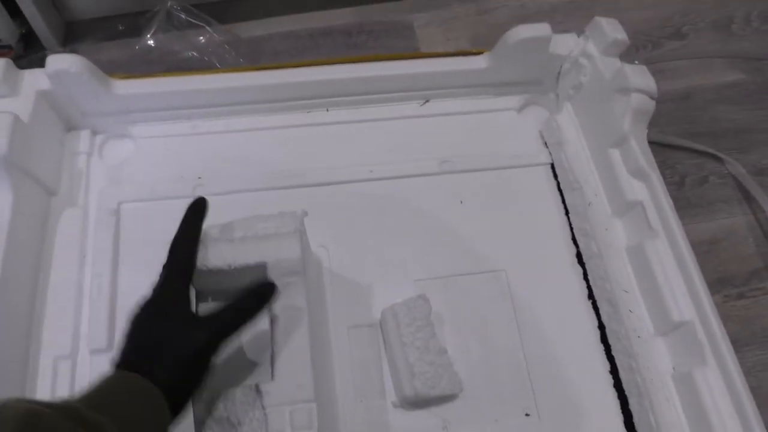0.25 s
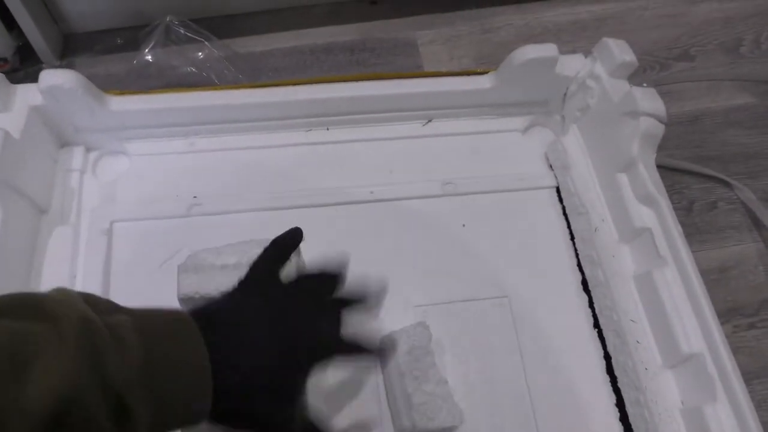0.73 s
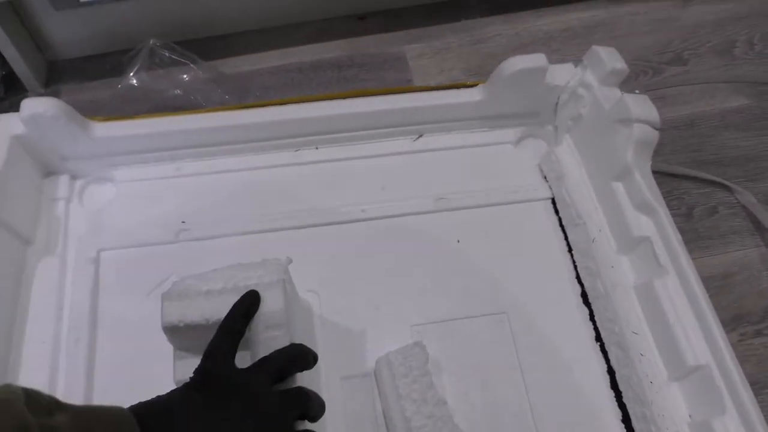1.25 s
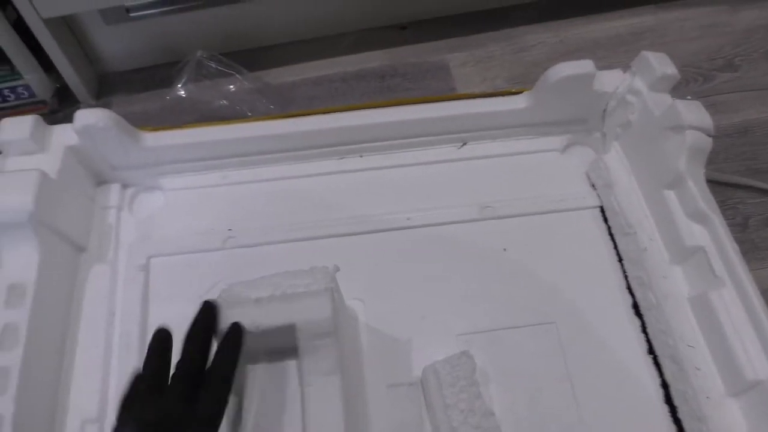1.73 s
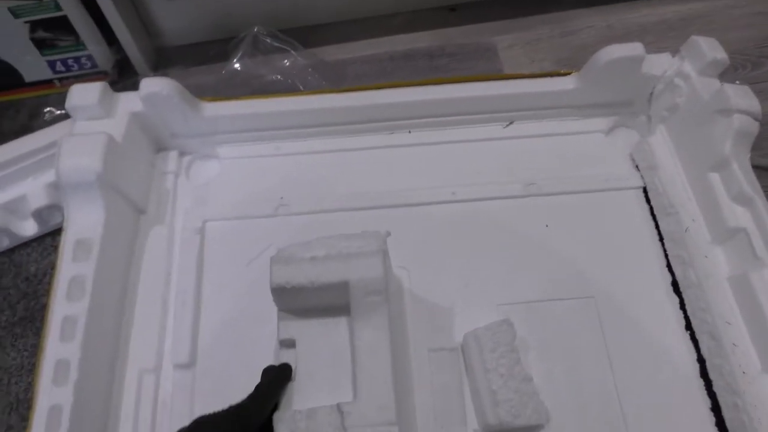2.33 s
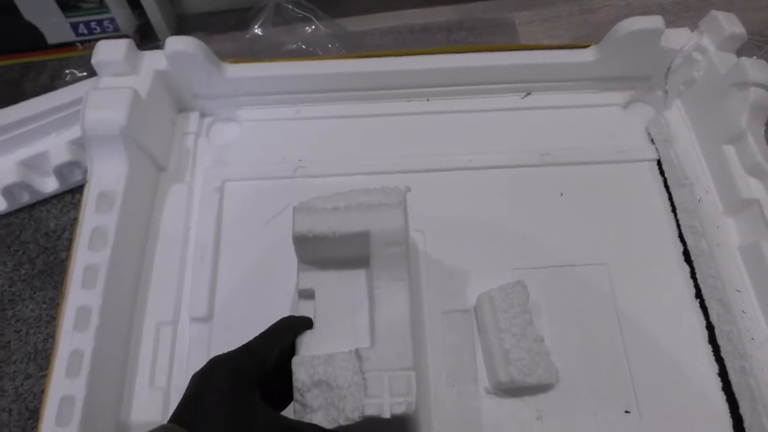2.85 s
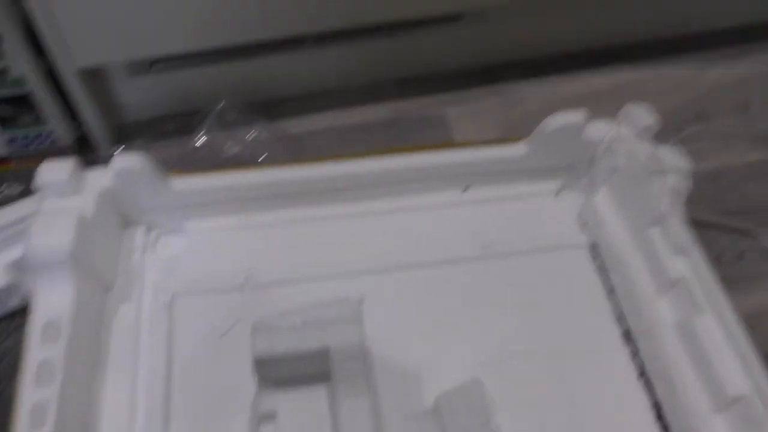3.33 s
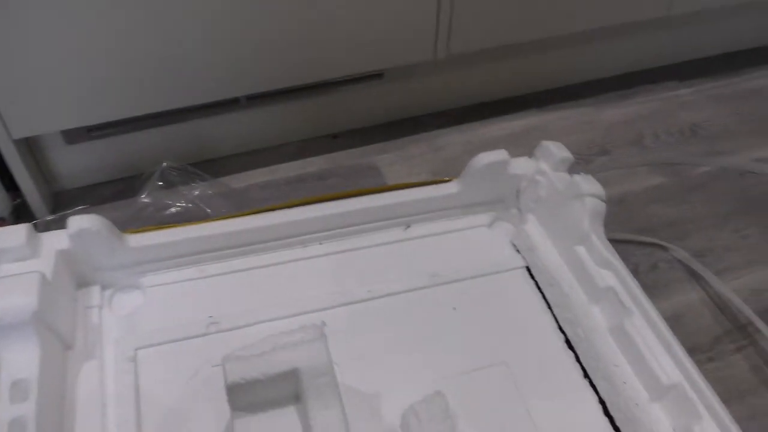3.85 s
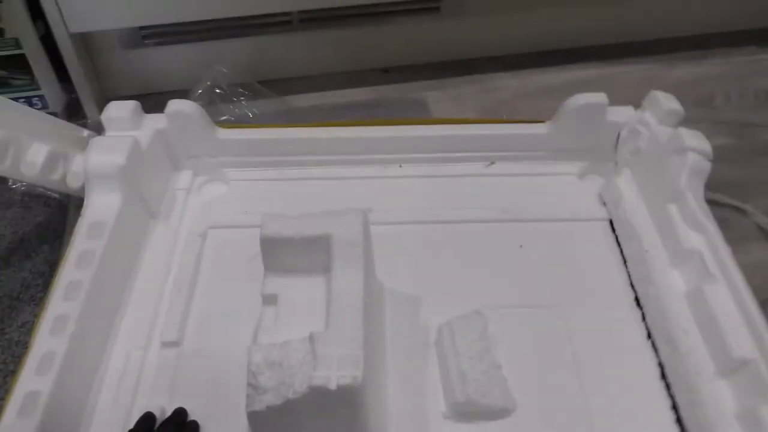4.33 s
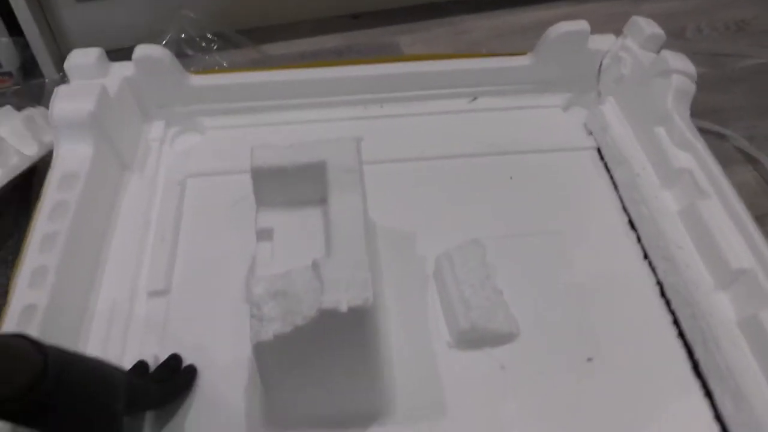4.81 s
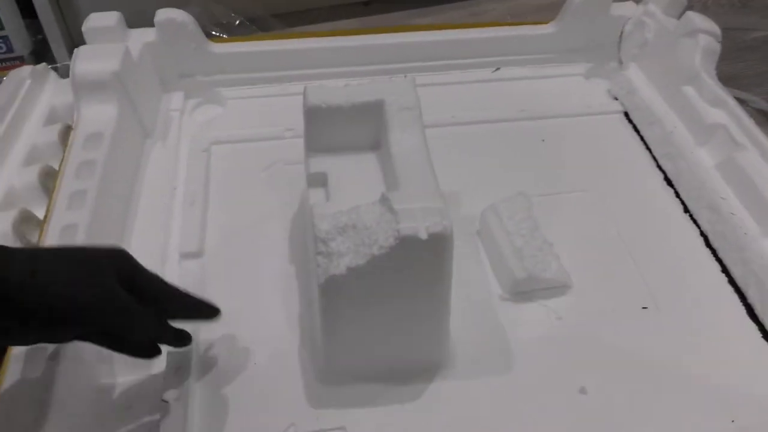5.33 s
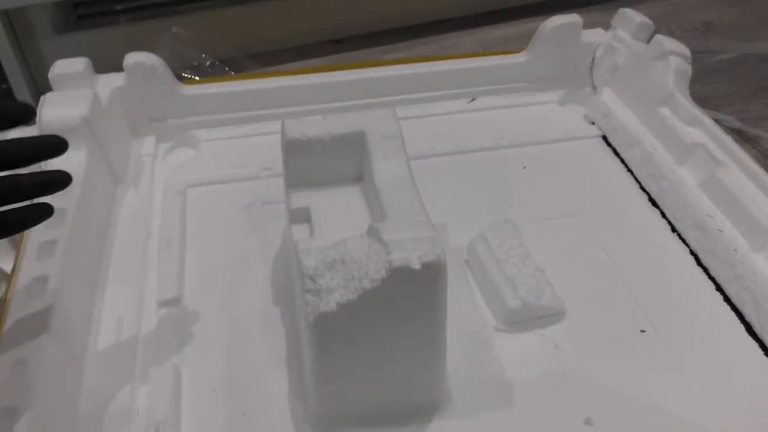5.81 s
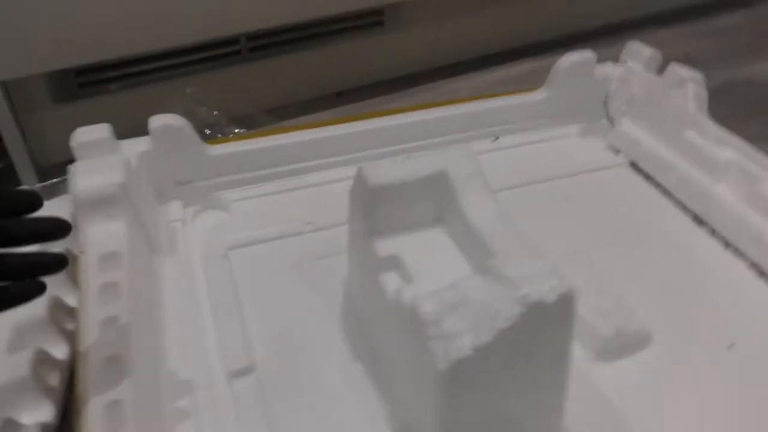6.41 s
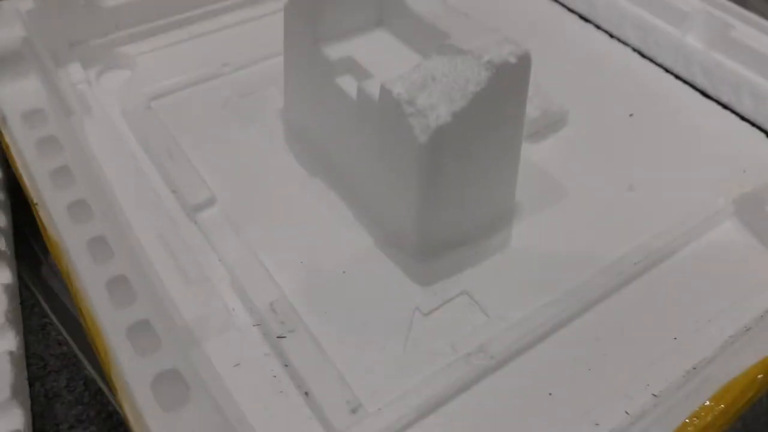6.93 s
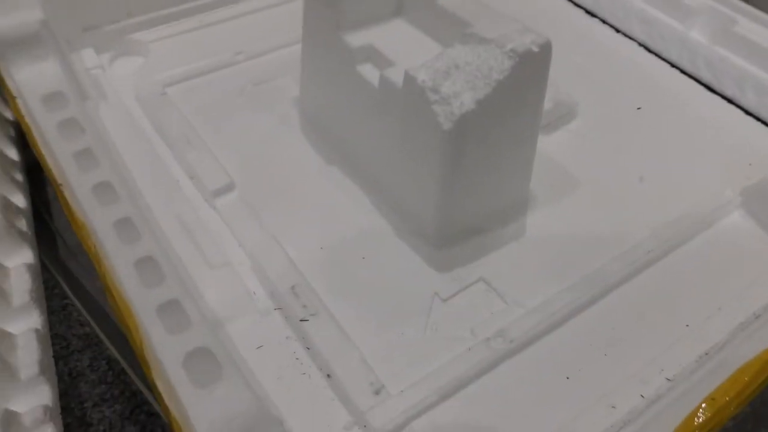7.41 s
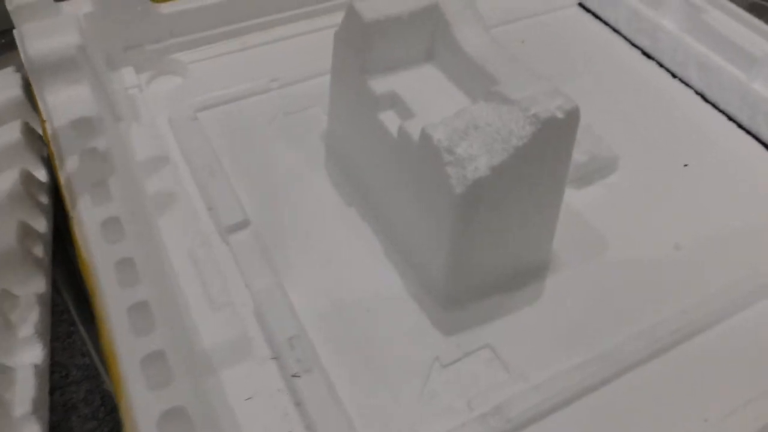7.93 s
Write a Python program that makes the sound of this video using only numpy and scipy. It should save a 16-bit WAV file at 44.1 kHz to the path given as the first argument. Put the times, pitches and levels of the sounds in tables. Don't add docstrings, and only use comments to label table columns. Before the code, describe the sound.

Close foam packing squeaks, scrapes and snaps under a glove, knocking boomily on its tray, then settles into sparse faint ticks and quiet room hum.

```python
import sys
import numpy as np
from scipy import signal
from scipy.fft import rfft, irfft, next_fast_len
from scipy.io import wavfile
from scipy.ndimage import uniform_filter1d

SR = 44100
rng = np.random.default_rng(int(sys.argv[2]) if len(sys.argv) > 2 else 0)


def wav_record(signal):
    frames = np.transpose(np.atleast_2d(signal))
    bounded = np.clip(frames, -1, 1)
    quanta = np.round(bounded * 32767).astype(np.int16)
    wavfile.write(sys.argv[1], SR, quanta)


def field_ratio(decibels):
    return 10 ** (np.asarray(decibels, dtype=float) / 20)


N = 359856

# pitch_hz, level_db_per_hz
AIR = [(18, -60), (30, -23), (81, 1.5), (180, -12), (287, -5), (560, -24.5), (1190, -25), (2750, -52)]
# pitch_hz, width_hz, level_db
HUM = [(82.7, 3.9, -56.5), (125.6, 11.3, -59)]
# pitch_hz, likeness_0_to_1
LIKENESS = [(60, 0.93), (150, 0.84), (330, 0.98), (700, 0.82), (1500, 0.71), (4000, 0.68), (8000, 1),
            (14000, 0.51)]
# time_s, left_minus_right_db
AIM = [(0, 0), (1.4, 0.2), (3.2, -0.5), (5.2, 1), (7.2, 0.5)]

# middle_s, scrape_db, slope_db_per_s, brightness_db, weight_on_tray_db
DRAGS = [(.1, -53, 34, -8.5, -6), (.915, -40, 302, 15, -2.5), (.98, -45.5, 114, 6, -6),
         (1.56, -39, 92, -8, -4), (1.693, -29.5, 205, -13, -5.5), (1.84, -46, 78, -24, 11.5),
         (2.14, -36.5, 61.5, 5, -3.5), (2.9, -61, 23, -2, 11), (3.35, -61.5, 15, -47, -2),
         (3.536, -37, 398, 1.5, 4), (3.566, -35.5, 505, 4.5, -3), (3.9, -50, 70, 3, -27),
         (4.27, -38.5, 43, 1, -1), (4.35, -33.5, 56, 6, -5), (4.44, -41.5, 60, -5, 6),
         (4.56, -32, 32, -0.5, -5), (4.703, -24, 239, -1, -6.5), (4.78, -36, 72, -0.5, -0.5),
         (5.1, -42.5, 6, -4, -1), (5.43, -38.5, 105, 8, 2.5), (5.475, -40.5, 152, 9, -3),
         (5.67, -56, 156, -2, -6), (5.75, -34, 67, -2, -6), (6.099, -49, 43, -4, 1.5),
         (6.86, -47, 13, -4, -3), (7.45, -51.5, 24, -25, -0.5)]
# start_s, scrape_db, hold_s, brightness_db
GRABS = [(0.409, -37, 0.014, -2), (0.542, -41, 0.023, -3), (0.748, -41.5, 0.029, -7),
         (1.045, -41.5, 0.0085, -3), (1.188, -43, 0.021, -1.5), (1.261, -43.5, 0.14, -6),
         (1.38, -45.5, 0.018, 18), (1.731, -39, 0.022, 0), (1.93, -32, 0.11, 0), (2.192, -46, 0.095, 10.5),
         (2.581, -55, 0, 5), (2.666, -52.5, 0, 3), (2.785, -36.5, 0.0069, -3.5), (3.136, -40, 0.0042, -3.5),
         (3.7, -54, 0.01, 1.5), (3.512, -43.5, 0.064, 9.5), (3.749, -44.5, 0, 7), (3.872, -60, 0.089, 19),
         (4.113, -43.5, 0.014, 15), (4.166, -35.5, 0.087, -3), (5.373, -36.5, 0, -11),
         (5.574, -38.5, 0.05, -15), (6.428, -51, 0.073, -10), (6.64, -53, 0.077, -11),
         (6.82, -44.5, 0.0076, -7), (7.285, -59.5, 0.097, 6), (8.115, -53, .05, -2.5)]
RESTING_DB = -74, -84, -79
# pitch_hz, level_db_per_hz
BOOM = [(59, -29), (100, -13.5), (210, -8.5), (306, 2), (360, -1.5), (605, -14), (850, -18), (1100, -61)]
# pitch_hz, level_db_per_hz
SCRAPE = [(470, -6), (800, -11.5), (1040, 8.5), (2230, 5.5), (2620, 3), (3580, -1.5), (4200, -7.5),
          (5460, -14.5)]
# pitch_hz, level_db_per_hz
HISS = [(2470, -16.5), (4200, -3), (7150, -4.5), (8790, -3.5), (12200, -6), (15100, -12), (16000, -13)]
# pitch_hz, width_hz, level_db
CELLS = [(930, 13, -13), (1032, 50, 0), (1450, 31, -10), (2105, 32, -7), (2330, 38, -3.5), (2730, 35, -1),
         (3203, 99, -4), (3530, 43, 2), (3830, 96, -1.5), (4830, 27, -0.5), (6630, 100, 1),
         (7180, 28, -9.5), (7440, 33, -7), (10300, 95, -5)]

# time_s, level_db
SQUEAKS = [
    [(.84, -47), (.865, -34), (.882, -39.5), (.897, -25), (.91, -32.5), (.93, -61)],
    [(.885, -63), (.9, -34.5), (.92, -30), (.93, -40), (1.0, -46.5), (1.07, -58)],
    [(1.368, -50), (1.38, -36.5), (1.407, -19), (1.429, -27), (1.436, -37), (1.47, -35), (1.5, -33.5),
     (1.56, -35.5), (1.64, -49.5)],
    [(1.92, -39), (1.945, -31.5), (1.975, -27.5), (2.0, -34), (2.05, -28), (2.1, -52)],
    [(2.222, -38), (2.232, -21.5), (2.238, -25.5), (2.246, -30), (2.27, -38)],
    [(2.262, -46), (2.28, -27), (2.295, -36), (2.307, -27), (2.316, -29.5), (2.4, -41), (2.57, -69)],
    [(2.72, -35), (2.742, -30), (2.75, -22.5), (2.756, -33), (2.765, -30), (2.785, -25.5), (2.82, -29),
     (2.84, -46)],
    [(3.722, -37.5), (3.76, -33), (3.8, -52)],
    [(.08, -63), (.2, -52), (.3, -75)],
    [(1.568, -50), (1.578, -31.5), (1.6, -33), (1.615, -33.5), (1.65, -45)],
    [(1.465, -43), (1.478, -28), (1.485, -25), (1.497, -34), (1.51, -52)],
    [(2.06, -53), (2.12, -45), (2.2, -35), (2.23, -39)],
    [(1.385, -45), (1.405, -25), (1.415, -29), (1.425, -50)],
    [(3.5, -57), (3.53, -34.5), (3.555, -27), (3.58, -36), (3.62, -52)],
    [(1.255, -57), (1.275, -40), (1.295, -36.5), (1.315, -57)],
    [(2.27, -45), (2.279, -26), (2.29, -45)],
]
# pitch_hz, width_hz, level_db
SKIN = [
    [(1250, 420, -3.5), (1830, 1700, -3), (2600, 130, -2.5)],
    [(2340, 170, -2), (4000, 400, 0.5), (5170, 330, -4), (6100, 360, -2.5), (6700, 530, 0.5),
     (7500, 2500, -1)],
    [(2380, 640, -11), (2680, 180, -3), (3260, 220, -8.5), (4810, 150, -7), (5390, 120, -14),
     (5830, 120, -15), (7040, 150, -12.5), (9310, 270, -13), (9900, 4500, -6), (4000, 2200, -6.5)],
    [(2090, 190, -14), (2290, 330, -11), (2100, 870, -1), (3570, 190, -13), (4790, 110, -12),
     (5570, 150, -14), (6600, 260, -12), (8100, 250, -24), (10500, 830, -6)],
    [(2500, 240, -5.5), (7400, 180, -0.5), (6300, 470, -14), (10900, 820, -11), (14100, 1900, -7)],
    [(7930, 330, -6.5), (8400, 200, -13), (9200, 250, -11), (8150, 5700, -2), (10500, 340, -6),
     (11500, 500, -17), (13600, 1200, -11), (2290, 470, -15)],
    [(352, 73, -4)],
    [(426, 280, -1.5), (1070, 62, -2.5), (1480, 58, -7.5), (2220, 660, -8.5)],
    [(5000, 21000, 0.5)],
    [(345, 95, -4), (269, 130, -9)],
    [(3180, 170, -3.5), (2510, 310, -3), (5000, 250, -10), (9700, 2200, -3)],
    [(4770, 260, -2), (1520, 370, -4), (3440, 520, -3), (5400, 300, -6)],
    [(2200, 200, -0.5), (5810, 150, -9)],
    [(11500, 4500, 0), (4200, 1200, -6.5)],
    [(2200, 1700, -0.5)],
    [(10500, 500, 2), (11800, 500, -5)],
]
CLIMBS = [0.1, 0.25, 0.14, 0.0406, 0.019, 0.12, 0.096, 0.029, -0.011, 0.072, -0.15, -0.0091, .15, .01, .01,
          .08]

# start_s, peak_db, pitch_hz
KNOCKS = [(0.412, -25.5, 318), (0.548, -30.5, 303), (.77, -19, 220), (1.191, -28.5, 320), (1.688, -19, 363),
          (1.797, -23, 396), (3.137, -22.5, 320), (3.534, -27.5, 395), (3.726, -25.5, 269),
          (4.179, -14, 414), (4.75, -19, 320), (4.99, -26.5, 313), (5.043, -29, 320), (5.583, -10, 370),
          (5.594, -17, 350), (5.606, -21, 330)]
# start_s, peak_db, pitch_hz
BUMPS = [(1.048, -27.5, 328), (1.276, -9, 269), (1.305, -21, 258), (1.708, -20.5, 380), (2.579, -26.5, 380),
         (2.799, -20, 345), (3.951, -26.5, 345), (1.943, -13.5, 413), (2.644, -26, 350), (5.375, -9.5, 298),
         (5.378, -23.5, 125), (5.579, -26, 125), (5.572, -12.5, 252), (5.622, -19, 443),
         (5.744, -23.5, 183), (5.827, -23.5, 223), (6.336, -28.5, 280), (7.218, -27, 245),
         (7.458, -34.5, 268), (7.524, -32.5, 248), (7.594, -35, 267), (5.66, -21, 450), (4.217, -21, 290),
         (4.408, -21.5, 280), (4.437, -25, 310), (4.515, -24, 310), (4.565, -24, 330), (4.18, -16.5, 240)]
# pitch_hz, level_db, share_of_ring_time
TRAY = [(122, 3.5, 0.95), (211.5, -2, 0.93), (270, 1.5, 0.45), (340, 3, 0.31), (396, 2.5, 0.43),
        (469, -12, 0.99)]
# pitch_hz, level_db, share_of_ring_time
BLOCK = [(682, -3.5, 0.95), (950, 3.5, 0.53), (1085, 5.5, 0.47), (1260, -2, 0.66), (1470, -5, 0.38)]

# start_s, peak_db, pitch_hz
TAPS = [(0.412, -18, 1480), (0.551, -19.5, 2840), (0.743, -27, 2710), (0.77, -17.5, 1356),
        (0.846, -25, 1240), (1.054, -21, 1270), (1.197, -23, 1450), (1.262, -23, 2710), (1.374, -14, 2290),
        (1.741, -19, 1710), (1.925, -17, 1960), (2.571, -24.5, 1700), (2.645, -23.5, 1650),
        (2.7936, -19, 1340), (2.891, -29, 2730), (3.1419, -21, 1620), (3.7634, -21, 1400),
        (3.8827, -19, 11100), (5.378, -6.5, 1220), (5.5862, -11, 1050), (5.587, -21, 2500),
        (4.181, -21, 1010), (1.689, -25, 1090), (6.4417, -25.5, 1590), (7.332, -23.5, 1440)]
# start_s, peak_db, pitch_hz, brightness_db
SNAPS = [(2.227, -3.5, 7300, -26), (2.2445, -11.5, 11000, 2.5), (2.306, -13.5, 11000, -1),
         (3.8385, -22, 4070, -5.5), (3.955, -12.5, 2200, -18), (4.12, -14, 4270, -8.5),
         (4.714, -20, 2500, -1), (4.943, -18.5, 9100, -5), (4.9995, -14, 4650, -9), (5.09, -30, 5500, -8),
         (5.2165, -20.5, 3400, -7.5), (5.269, -21.5, 9800, -15), (5.316, -22.5, 1390, -35),
         (5.545, -29, 12000, -11), (5.629, -23.5, 3000, -0.5), (5.7037, -13.5, 1130, -6),
         (5.826, -24, 1870, -7), (0.757, -32, 6000, 0), (3.494, -46, 9500, -15), (3.624, -26.5, 9000, 0),
         (3.901, -27, 11000, -5), (3.913, -24.5, 10000, -5), (4.039, -29, 11500, -8),
         (4.052, -29, 10500, -8), (4.068, -25, 12500, -7), (5.986, -25.5, 9000, -0.5),
         (6.129, -20, 4000, -10), (6.387, -36, 11000, -20), (6.6441, -23.5, 2000, -8),
         (6.686, -31, 10000, -3), (7.773, -39, 9000, -3), (7.832, -39, 10000, -3), (2.951, -34, 8920, -2),
         (7.9132, -27.5, 3300, -6), (1.261, -19, 10200, -7), (5.1704, -27, 3500, -8),
         (5.2533, -21, 3100, -6.5), (8.134, -31.5, 8000, -6)]
# start_s, peak_db, pitch_hz
TICKS = [(1.707, -13, 1300), (4.1, -20.5, 2300), (4.0584, -11.5, 1710), (4.626, -12, 2400),
         (7.3, -29, 2500), (5.658, -6, 10000), (5.9929, -13.5, 1900), (6.108, -21.5, 2650),
         (6.128, -14, 10400), (6.2656, -22.5, 3040), (6.2913, -19.5, 1250), (4.107, -16, 3200),
         (7.653, -25, 1500), (7.7535, -26, 1220), (2.486, -30, 2000), (7.596, -32, 5800),
         (7.677, -36, 5000), (7.8037, -34, 5500), (7.528, -32, 1500), (8.3, -26, 1180), (7.3721, -31, 1450),
         (5.377, -11, 3300), (3.9555, -9, 11000), (5.5865, -11, 1000), (4.437, -17, 2400)]
# start_s, peak_db, pitch_hz
GRAINS = [(2.582, -31, 1070), (2.9504, -37.5, 1070), (3.037, -42, 1060), (3.0683, -40, 1060),
          (4.0264, -28, 1070), (4.2444, -17, 1040), (4.9664, -25, 1060), (5.171, -38, 1110),
          (6.2487, -34, 1200), (6.513, -32.5, 2400), (6.552, -36, 1680), (6.8244, -31, 1400),
          (6.9503, -30, 1900), (7.2744, -46, 1320), (7.296, -32, 2050), (7.423, -36.5, 1210),
          (7.5158, -36, 1210), (7.5965, -41, 1840), (7.6774, -45.5, 1070), (7.7228, -38, 1210),
          (7.8037, -38.5, 1890), (7.9504, -36, 1120), (8.0711, -44, 2130)]


def rms_one(x):
    return x / np.sqrt(np.mean(x ** 2) + 1e-20)


def in_time(rows):
    s, *columns = np.transpose(rows)
    return [np.interp(np.arange(N) / SR, s, column) for column in columns]


def at_hz(points, hz):
    point_hz, value = np.array(points).T
    return np.interp(np.log(hz), np.log(point_hz), value)


def drift(rate_hz):
    r = np.exp(-40 * np.pi * rate_hz / SR)
    noise = rng.standard_normal(N // 20 + 2002)
    slow = signal.lfilter([1], [1, -2 * r, r * r], noise)[2000:]
    return np.interp(np.arange(N) / 20, np.arange(len(slow)), rms_one(slow))


def resonate(x, hz, width_hz):
    r = np.exp(-np.pi * width_hz / SR)
    feed = (1 - r * r) / 2 * np.array([1, 0, -1])
    back = [1, -2 * r * np.cos(2 * np.pi * hz / SR), r * r]
    return signal.lfilter(feed, back, x)


def slips(per_s, spread_db, smooth):
    shape = (2, 2, N)
    trains, luck = np.zeros(shape), rng.random(shape)
    slip = luck < per_s / SR
    odds = luck[slip] * SR / per_s
    rarity = np.minimum(-np.log(np.abs(2 * odds - 1) + 1e-9), 5)
    trains[slip] = field_ratio(spread_db * rarity) * np.sign(odds - 0.5)
    bed = smooth * rng.standard_normal(shape) if smooth else 0
    return rms_one(trains) + bed


def coloured(drive, spectrum, patchy_db):
    together = 0.75 * drift(93.0) + 1.08 * drift(18.6)
    lowest, highest = spectrum[0][0], min(spectrum[-1][0], 17500) * 1.05
    edges = np.geomspace(lowest, highest, round(2.5 * np.log2(highest / lowest)) + 1)
    out = 0
    for k, (low, high) in enumerate(zip(edges, edges[1:])):
        band = signal.butter(2, [low, high], "band", fs=SR, output="sos")
        mid, side = signal.sosfilt(band, drive[k % 2])
        hz = np.sqrt(low * high)
        alike = np.clip(at_hz(LIKENESS, hz), 0, 0.995)
        flicker_db = patchy_db * (0.45 * together + drift(10.7))
        gain = field_ratio(at_hz(spectrum, hz) + flicker_db)
        out = out + gain * (np.sqrt(1 + alike) * mid + np.sqrt(1 - alike) * side * [[1], [-1]])
    return rms_one(out)


def background():
    hum = 0
    for hz, width_hz, db in HUM:
        tone = resonate(resonate(rng.standard_normal(N), hz, width_hz), hz, width_hz)
        hum = hum + field_ratio(db) * rms_one(tone)
    air = field_ratio(-51.5) * coloured(rng.standard_normal((2, 2, N)), AIR, patchy_db=-0.8)
    mic_hiss = field_ratio(-65) * rng.standard_normal((2, N))
    return air + hum + mic_hiss


def strokes():
    t = np.arange(0, N / SR + 1 / 500, 1 / 500)[:, None]
    rise_db_s, fall_db_s = 1800, 143
    s, grab_db, hold, grab_bright_db = np.transpose(GRABS)
    top = s + 0.0079
    after_hold = np.maximum(t - top - np.maximum(hold, 0), 0)
    grab_below = np.maximum(rise_db_s * (top - t), fall_db_s * after_hold)
    grab_weight_db = -7 - 1.1 * grab_bright_db
    middle, drag_db, slope, drag_bright_db, drag_weight_db = np.transpose(DRAGS)
    drag_below = slope * np.abs(t - middle)
    fade_speeds = (1, 1, 1.327)
    grab_tilts = (grab_weight_db, 0, grab_bright_db)
    drag_tilts = (drag_weight_db, 0, drag_bright_db)
    levels = []
    for rest_db, fades, grab_tilt_db, drag_tilt_db in zip(RESTING_DB, fade_speeds, grab_tilts, drag_tilts):
        grabs_db = grab_db + grab_tilt_db - fades * grab_below
        drags_db = drag_db + drag_tilt_db - fades * drag_below
        power = field_ratio(2 * rest_db) + field_ratio(2 * np.hstack([grabs_db, drags_db])).sum(axis=1)
        levels.append(np.interp(np.arange(N) / SR, t[:, 0], 10 * np.log10(power)))
    return levels


def rubbing(duck):
    boom_db, scrape_db, hiss_db = strokes()
    boom = coloured(slips(per_s=250, spread_db=1.5, smooth=0.92), BOOM, patchy_db=1.5)
    pops = slips(per_s=51, spread_db=2.5, smooth=0)[0, 0] * rng.standard_normal((2, 2, 1))
    puffs = signal.lfilter([1], [1, -0.975], np.abs(pops))
    pops = rms_one(puffs * rng.standard_normal((2, 2, N)))
    hard_db = np.maximum(np.maximum(scrape_db, hiss_db) + 42.5, 0)
    beads = slips(per_s=2500, spread_db=3.0, smooth=0.65)
    beads = beads + 0.21 * pops * field_ratio(-1.1 * hard_db)
    cells = sum(field_ratio(db) * resonate(beads, hz, width_hz) for hz, width_hz, db in CELLS)
    beads = beads + field_ratio(-4) * cells
    scrape = coloured(beads, SCRAPE, patchy_db=2.0)
    hiss = coloured(beads, HISS, patchy_db=1.12)
    return duck * (field_ratio(boom_db) * boom + field_ratio(scrape_db) * scrape) + field_ratio(hiss_db) * hiss


def squeaks():
    out, chatter = np.zeros((2, N)), slips(per_s=4000, spread_db=-1.5, smooth=1.0)
    waver, flutter = 0.0204 * drift(40.7), [drift(23.0) for k in range(10)]
    for rows, modes, climb in zip(SQUEAKS, SKIN, CLIMBS):
        start_s, end_s = rows[0][0], rows[-1][0]
        span = slice(round(start_s * SR), round(end_s * SR))
        steps = np.arange(span.stop - span.start)
        speed = 1 - climb * np.exp(-steps / SR / 0.016) + waver[span]
        read_at = np.cumsum(speed)
        effort_db = np.interp(start_s + steps / SR, *np.transpose(rows))
        for k, (hz, width_hz, db) in enumerate(modes):
            mid, side = chatter[k % 2, :, span]
            stereo = mid + 0.043 * side * [[1], [-1]]
            tone = rms_one(resonate(resonate(stereo, hz, width_hz), hz, 2 * width_hz))
            tone = np.array([np.interp(read_at, steps, ear) for ear in tone])
            out[:, span] += field_ratio(effort_db + db + 1.1 * flutter[k][span]) * tone
    return out


def knocks():
    out, t = np.zeros(N + SR), np.arange(SR // 3) / SR
    modes = np.array(TRAY + BLOCK)
    hz, level_db, share = modes.T[:, :, None]
    on_block = (np.arange(len(modes)) >= len(TRAY))[:, None]
    knock_hardness_db, bump_hardness_db = -6, -26
    blows = [(*row, knock_hardness_db) for row in KNOCKS] + [(*row, bump_hardness_db) for row in BUMPS]
    luck = rng.standard_normal((len(blows), 2, len(modes), 1))
    dull = np.vstack([signal.butter(6, 520, fs=SR, output="sos"),
                      signal.butter(2, 80, "high", fs=SR, output="sos")])
    onset = np.sin(np.pi / 2 * np.minimum(t / 0.0047, 1)) ** 2
    for (s, peak_db, home_hz, hard_db), (tune, vary) in zip(blows, luck):
        t60 = 0.18 * (home_hz / 320) ** 0.87 * (2 - 0.15 * (peak_db + 34.5))
        off_spot_db = -16 * np.abs(np.log2(hz / home_hz))
        place_db = np.where(on_block, hard_db - 3.5, off_spot_db)
        dying = field_ratio(level_db + place_db + 1.4 * vary - 60 * t / (max(t60, 0.02) * share))
        rings = dying * np.cos(2 * np.pi * hz * (1 + 0.037 * tune) * (t - 0.004)) * onset
        tray, block = rings[:len(TRAY)].sum(axis=0), rings[len(TRAY):].sum(axis=0)
        wave = signal.sosfilt(dull, tray) + block
        at = round(s * SR)
        out[at:at + len(t)] += field_ratio(peak_db - 2.0) * wave / np.abs(wave).max()
    return out[:N]


def skin(x, hz):
    low_hz = min(hz, 2500)
    knock = resonate(resonate(x, low_hz, 2800), low_hz, 4800)
    return resonate(x, hz, 0.22 * hz) + 0.39 * knock


def snaps():
    out, t = np.zeros((2, N + SR)), np.arange(SR // 7) / SR
    tap_t60_s, snap_t60_s, tick_t60_s = 0.11, 0.08, 0.04
    tap_bright_db, tick_bright_db, grain_bright_db = -9, -21, -25
    cracks = [(*row, tap_bright_db, tap_t60_s) for row in TAPS]
    cracks += [(*row, snap_t60_s) for row in SNAPS]
    cracks += [(*row, tick_bright_db, tick_t60_s) for row in TICKS]
    cracks += [(s, db + 8.5, hz, grain_bright_db, tick_t60_s) for s, db, hz in GRAINS]
    luck = rng.standard_normal((len(cracks), 2, len(t)))
    treble = signal.butter(2, 4500, "high", fs=SR, output="sos")
    for (s, peak_db, hz, bright_db, t60), (mid, side) in zip(cracks, luck):
        t60 = t60 * field_ratio(min(peak_db + 21, 0))
        dying = field_ratio(-60 * t / max(t60, 0.008)) + 0.92 * field_ratio(-60 * t / 0.0075)
        shape = dying * (1 - np.exp(-t / 0.00033))
        burst = (mid + 0.23 * side * [[1], [-1]]) * shape
        burst[:, 8] += field_ratio(10.5) * (t60 < tick_t60_s)
        ring, answer = skin(burst, hz), skin(t == 0, hz)
        ring = ring * np.sqrt(np.sum(shape ** 2) * np.sum(answer ** 2) / np.sum(ring[0] ** 2))
        spray = signal.sosfilt(treble, burst) * (1 - np.exp(-t / 0.00094))
        crack = field_ratio(bright_db + 7.5) * spray + 2.6 * ring * np.sqrt(2500 / hz)
        at = round(s * SR)
        out[:, at:at + len(t)] += field_ratio(peak_db - 14.0) * crack
    return out[:, :N]


def room(x):
    t60_s, wall_cut_hz = 0.23, 5600
    size = next_fast_len(N + SR)
    w = 2 * np.pi * np.arange(size // 2 + 1) / size
    dull = 1 / (1 + 1j * w * SR / (2 * np.pi * wall_cut_hz)) ** 0.32
    thin = 1j * w / (1j * w + 2 * np.pi * 500 / SR)
    spectrum, out = rfft(x, size) * thin * thin, np.zeros((2, size // 2 + 1), complex)
    for k, lag in enumerate(rng.uniform(0.009, 0.027, 12) * SR):
        loop = field_ratio(-60 * lag / SR / t60_s) * dull * np.exp(-1j * w * lag)
        out[k % 2] += (-1) ** (k // 2) * loop / (1 - loop)
    return irfft(out * spectrum, size)[:, :N]


def ducking(loud):
    from_db, slope, release_db_s = -29, 0.75, 37
    level_db = 10 * np.log10(uniform_filter1d(np.mean(loud ** 2, axis=0), 441) + 1e-12)
    ramp = release_db_s * np.arange(N) / SR
    held_db = np.maximum.accumulate(level_db + ramp) - ramp
    return field_ratio(-slope * uniform_filter1d(np.maximum(held_db - from_db, 0), 441))


def scene():
    squeal = squeaks()
    struck = knocks() + squeal + snaps()
    echo = field_ratio(-14) * room(struck.mean(axis=0))
    foam = struck + rubbing(ducking(squeal) ** 1.7) + echo
    aim = field_ratio(in_time(AIM)[0] / 2 * [[1], [-1]])
    return foam * aim + ducking(foam) * background()


def low_pass(x):
    return signal.sosfilt(signal.butter(12, 16810, fs=SR, output="sos"), x)


def record(dry):
    rounded = 0.6 * np.tanh(dry / 0.6)
    steep = signal.ellip(11, 0.5, 80, 15900, fs=SR, output="sos")
    mix = signal.sosfilt(steep, rounded)
    return low_pass(mix)


dry = scene()
out = record(dry)
wav_record(out)
```